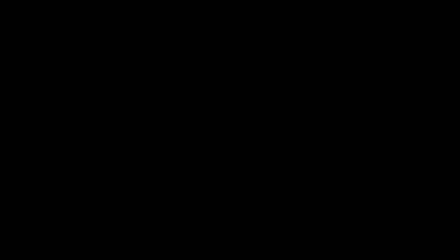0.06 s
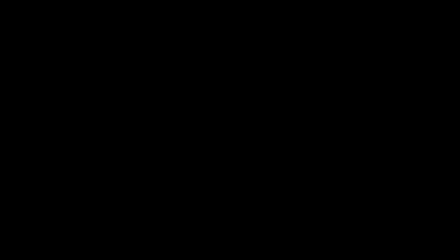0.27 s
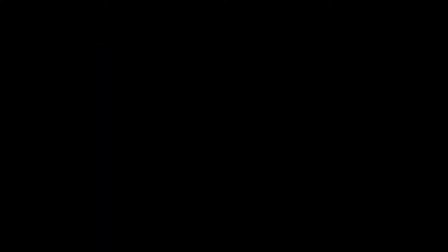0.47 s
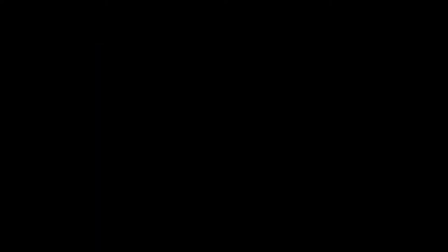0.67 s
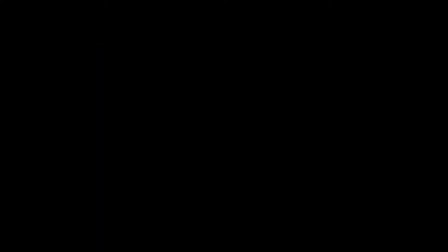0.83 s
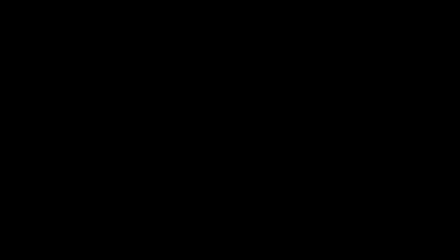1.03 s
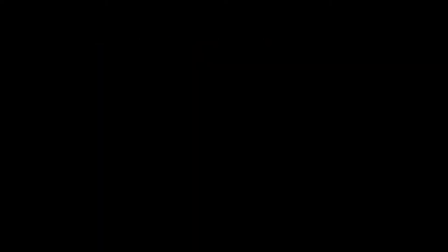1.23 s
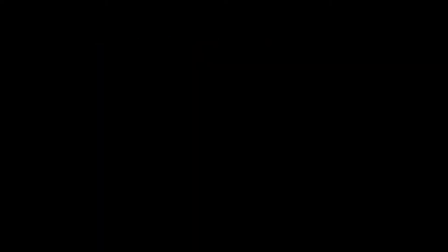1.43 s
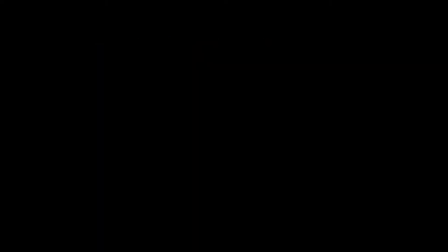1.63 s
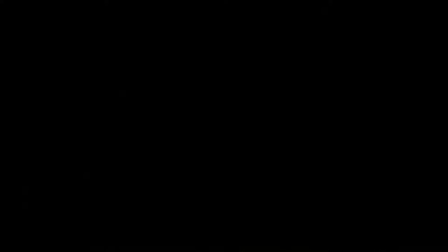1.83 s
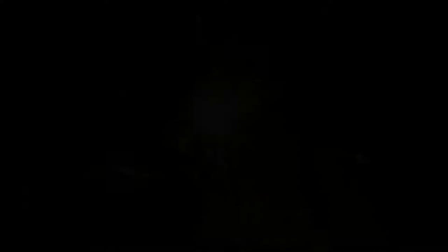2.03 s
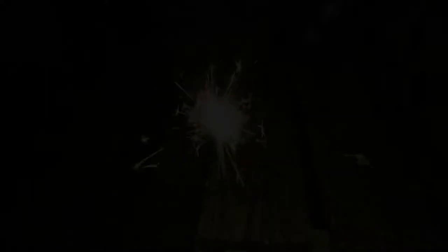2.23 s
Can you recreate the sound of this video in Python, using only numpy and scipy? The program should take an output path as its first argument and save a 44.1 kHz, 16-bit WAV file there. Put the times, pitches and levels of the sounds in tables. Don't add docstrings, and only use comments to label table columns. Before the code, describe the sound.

A sparkler fizzes steadily at night amid whining insects, then a hard knock bounces beside the microphone

```python
import sys
import numpy as np
from scipy import signal
from scipy.fft import rfft, irfft, next_fast_len
from scipy.io import wavfile

SR = 44100
rng = np.random.default_rng(int(sys.argv[2]) if len(sys.argv) > 2 else 0)


def store_wav(level_fs):
    pcm = np.round(np.clip(np.atleast_2d(level_fs), -1, 1) * 32767)
    wavfile.write(sys.argv[1], SR, pcm.T.astype(np.int16))


def gain_from_db(level_db):
    decades = np.asarray(level_db, float) / 20
    return 10 ** decades


N = 101430


def rms_one(x):
    return x / np.sqrt(np.mean(x ** 2) + 1e-20)


def at_hz(points, hz):
    table_hz, table_db = np.transpose(points)
    return np.interp(np.log(hz), np.log(table_hz), table_db)


def drift(rate_hz):
    step = 40
    r = np.exp(-2 * np.pi * rate_hz * step / SR)
    settle = 2000
    noise = rng.standard_normal(N // step + 2 + settle)
    slow = signal.lfilter([1], [1, -2 * r, r * r], noise)[settle:]
    return np.interp(np.arange(N) / step, np.arange(len(slow)), rms_one(slow))


def band(x, low_hz, high_hz, order=2):
    return signal.sosfilt(signal.butter(order, [low_hz, high_hz], "band", fs=SR, output="sos"), x)


def coloured(source, spectrum, patchy_db):
    edges = 25 * 2 ** np.arange(0, 9.6, 1 / 3)
    first, last = spectrum[0][0] / 2, spectrum[-1][0] * 2
    flat = np.zeros(N)
    for k, (low_hz, high_hz) in enumerate(zip(edges, edges[1:])):
        if first < low_hz < last:
            flat += gain_from_db(patchy_db * drift(22)) * band(source[k % 2], low_hz, high_hz)
    size = next_fast_len(N)
    hz = 1 + np.arange(size // 2 + 1) * SR / size
    shaped = irfft(rfft(flat, size) * gain_from_db(at_hz(spectrum, hz)), size)
    return rms_one(shaped[:N])


def click(s, db):
    x = np.full(N, 1e-18)
    x[int(s * SR)] = gain_from_db(db)
    return x


def ring(x, hz, t60):
    r = gain_from_db(-60 / (t60 * SR))
    w = 2 * np.pi * hz / SR
    return signal.lfilter([0, np.sin(w)], [1, -2 * r * np.cos(w), r * r], x)


def dying(s, t60):
    after = np.arange(N) / SR - s
    return (after >= 0) * gain_from_db(-60 * np.maximum(after, 0) / t60)


# time in seconds, level in dB.
BURN_LEVEL = [(0, -41), (.12, -42), (.43, -42), (.49, -38.5), (.58, -39.5), (.74, -43.5), (.8, -39.5),
              (.97, -44), (1.08, -40.5), (1.19, -42), (1.28, -40.5), (1.43, -41.5), (1.465, -45),
              (1.52, -41), (1.78, -41.5), (1.97, -39), (2.1, -43), (2.27, -41.5)]
# frequency in Hz, density in dB per Hz.
FIZZ_COLOUR = [(250, -3.5), (2300, 0.5), (4000, -7), (5600, -8), (8300, -4.5), (10400, 1), (13000, -5.5),
               (15600, -14.5)]
# time in seconds, rise in dB.
GAS_SPITS = [(.066, 3), (.252, 2), (.716, 4), (.784, 3), (.835, 3), (1.046, 3), (1.108, 4), (1.27, 2),
             (1.304, 3), (1.412, 4), (1.432, 3), (1.505, 3), (1.529, 4), (1.63, 3), (1.735, 2.5)]
SPARKS_PER_S, SPARK_SPREAD_DB, SPARK_SHARE = 3000, 3.5, 0.51
SPIT_RISE_S, SPIT_FALL_S = 0.00067, 0.01
FIZZ_DB, FLUTTER_DB, FLUTTER_HZ = 3.5, 0.8, 30


def sparkler():
    t = np.arange(N) / SR
    sparks = (rng.random((2, N)) < SPARKS_PER_S / SR) * rng.choice([-1, 1], (2, N))
    spark_size = np.minimum(rng.exponential(1, (2, N)), 4)
    sparks = rms_one(sparks * gain_from_db(SPARK_SPREAD_DB * spark_size))
    jet = rng.standard_normal((2, N))
    source = np.sqrt(1 - SPARK_SHARE) * jet + np.sqrt(SPARK_SHARE) * sparks
    level_db = np.interp(t, *np.transpose(BURN_LEVEL)) + FIZZ_DB + FLUTTER_DB * drift(FLUTTER_HZ)
    for s, rise_db in GAS_SPITS:
        peak_s = s + SPIT_RISE_S
        pace_s = np.where(t < peak_s, SPIT_RISE_S, SPIT_FALL_S)
        level_db = level_db + rise_db * np.exp(-np.abs(t - peak_s) / pace_s)
    return gain_from_db(level_db) * coloured(source, FIZZ_COLOUR, patchy_db=0.7)


# start in seconds, push in dB,
# crack in dB, scatter in dB, scatter t60 in seconds.
BLOWS = [
    (1.8143, -24, -4, -5.5, 0.11),
    (1.9557, -15, -24, -14, 0.13),
    (2.02, -26, -42, -27, 0.1),
]
# frequency in Hz, level in dB, t60 in seconds.
KNOCK_MODES = [(234, -11.5, 0.097), (373, -24, 0.097), (499, -21, 0.16), (643, -11, 0.048),
               (684, -12.5, 0.11), (820, -16.5, .018), (990, -13, 0.083), (1283, -6.5, 0.041),
               (1774, -6.5, 0.064), (2320, -12, 0.032), (2590, -19.5, 0.033), (2690, -10.5, 0.035),
               (3560, -18, .02)]
BOUNCE_MODES = [(292, -21, 0.049), (460, -36, 0.073), (702, -20, 0.083), (834, -33, 0.051),
                (1040, -18, 0.024), (1330, -1, 0.014), (1490, -8.5, 0.031), (2080, -13, 0.042),
                (2560, -20, .012), (3800, -12, 0.0066), (4900, -30, 0.0043)]
LAST_BOUNCE_MODES = [(239, -17, 0.016), (397, -30, 0.12), (602, -29, 0.063), (870, -39, .06),
                     (1000, -24.5, 0.044), (1394, -20.5, 0.039), (1730, -44, .04)]
PUSH_S, CRACK_T60_S = 0.0005, 0.013


def knocks():
    out, t = np.zeros(N), np.arange(N) / SR
    mode_sets = (KNOCK_MODES, BOUNCE_MODES, LAST_BOUNCE_MODES)
    for (s, push_db, crack_db, _, _), modes in zip(BLOWS, mode_sets):
        out += 0.5 * gain_from_db(push_db) * np.exp(-((t - s - PUSH_S / 2) / PUSH_S * 4) ** 2)
        for hz, mode_db, mode_t60 in modes:
            out += ring(click(s, mode_db), hz, mode_t60)
        crack = band(rng.standard_normal(N), 2300, 9800, order=1)
        out += gain_from_db(crack_db) * crack * dying(s, CRACK_T60_S)
    return out


# frequency in Hz, density in dB per Hz.
SCATTER_COLOUR = [(100, -10), (250, -1), (500, 0), (1100, -1), (2200, -8), (4000, -24), (9500, -32),
                  (15000, -44)]
RATTLES_PER_S = 500
LINGER_DB, LINGER_T60_S = -19.5, 0.38


def scatter():
    out = np.zeros(N)
    rattle = (rng.random((2, N)) < RATTLES_PER_S / SR) * rng.standard_normal((2, N))
    source = rms_one(rattle) + 0.5 * rng.standard_normal((2, N))
    debris = coloured(source, SCATTER_COLOUR, patchy_db=-1.0)
    for s, _, _, scatter_db, t60 in BLOWS:
        tail = dying(s, t60) + gain_from_db(LINGER_DB) * dying(s, LINGER_T60_S)
        out += gain_from_db(scatter_db) * debris * tail
    return out


# start in seconds, peak in dB, pitch in Hz,
# rise in seconds.
STAND_WOBBLES = [(1.815, -12, 95, .012), (1.8165, -9, 147, .012), (1.86, -19, 160, .013),
                 (1.9, -28, 118, .015), (1.935, -29, 220, .01), (1.953, -30, 95, .012),
                 (2.003, -27, 165, .013), (2.07, -38, 100, .013), (2.098, -35.5, 140, .013)]


def stand():
    out, t = np.zeros(N), np.arange(N) / SR
    rumble = rms_one(band(rng.standard_normal(N), 56, 400))
    for s, db, hz, rise_s in STAND_WOBBLES:
        age = np.maximum(t - s, 0) / rise_s
        sway = np.sin(2 * np.pi * hz * (t - s)) + 0.3 * rumble
        out += gain_from_db(db) * sway * (age * np.exp(1 - age)) ** 2
    return out


def jingle():
    peak_s, length_s, level_db = 1.834, 0.026, -25
    t = np.arange(N) / SR
    noise = rms_one(band(rng.standard_normal(N), 8600, 11500))
    return gain_from_db(level_db) * noise * np.exp(-(2 * (t - peak_s) / length_s) ** 2)


# time in seconds, peak in dB, pitch in Hz, t60 in seconds.
GRIT_TICKS = [(.0663, -38, 1980, .01), (.6692, -23, 1380, .014), (.6745, -36, 980, .025),
              (.7185, -34, 2100, .01), (.7515, -30, 1400, .012), (.7545, -25, 1900, .016),
              (.7884, -29, 1150, .008), (1.6986, -27, 1040, .008), (1.8563, -19, 1410, .014),
              (1.863, -23, 1100, .02), (1.9402, -25, 1000, .025), (2.2379, -36, 1300, .01)]
OVERTONE_RATIO, OVERTONE_DB = 1.62, -2


def ticks():
    out = np.zeros(N)
    for s, db, hz, t60 in GRIT_TICKS:
        out += ring(click(s, db), hz, t60)
        out += ring(click(s, db + OVERTONE_DB), hz * OVERTONE_RATIO, t60)
    return out


# time in seconds, peak in dB.
SPARK_POPS = [
    (.2530, -18),
    (1.529, -23),
    (1.8008, -16),
    (1.8108, -12),
    (1.8278, -11),
    (1.8325, -13),
    (1.9686, -14),
]


def pops():
    return -sum(band(click(s, db + 9.5), 500, 11000, order=1) for s, db in SPARK_POPS)


def chorus(singers, wander_hz, depth, chirp_db, sway_db, spread):
    out, t = 0, np.arange(N) / SR
    for hz, db, pulses_per_s, chirps_per_s in singers:
        pulse_phase, chirp_phase = rng.random(2) * [spread, 1]
        tone = np.sin(2 * np.pi * np.cumsum(hz + wander_hz * drift(15.36)) / SR)
        pulse_turns = pulses_per_s * t + pulse_phase + 0.05 * drift(4.2)
        pulse = 1 + depth * np.sin(2 * np.pi * pulse_turns)
        chirp = np.sin(2 * np.pi * (chirps_per_s * t + chirp_phase))
        out = out + tone * pulse * gain_from_db(db + chirp_db * chirp + sway_db * drift(5.2))
    return out


# pitch in Hz, level in dB, pulses per second,
# chirps per second.
HIGH_SINGERS = [(6850, -57, 52, 4.1), (6990, -49, 47, 4.9), (7078, -44, 50, 4.6), (7165, -48, 44, 5.3),
                (7250, -44, 49, 4.7), (7330, -48, 55, 4.4), (7410, -48, 41, 5.1), (7545, -50, 46, 4.8),
                (7740, -52, 40, 4.7)]
LOW_SINGERS = [(3190, -57, 69, 1.3), (3230, -52, 73, .9), (3303, -49, 73, 1.7), (3376, -48, 73, 1.1),
               (3449, -54, 73, 2.3)]
# low edge in Hz, high edge in Hz, level in dB.
FAR_CHORUS = [
    (6790, 7520, -36),
    (3127, 3430, -42),
]


def insects():
    far = np.zeros(N)
    for low_hz, high_hz, db in FAR_CHORUS:
        far += gain_from_db(db) * rms_one(band(rng.standard_normal(N), low_hz, high_hz, order=3))
    high = chorus(HIGH_SINGERS, wander_hz=12.61, depth=0.96, chirp_db=1.0, sway_db=5.9, spread=0.85)
    low = chorus(LOW_SINGERS, wander_hz=7.85, depth=1.0, chirp_db=0.83, sway_db=2.7, spread=0.47)
    return far + gain_from_db(0.8) * high + gain_from_db(-2.4) * low


# frequency in Hz, density in dB per Hz.
HUM_COLOUR = [(30, 13), (60, -2), (90, 1), (125, 12), (180, -23), (240, 12), (320, -19), (500, -4.5)]


def hum():
    return gain_from_db(-54.5) * coloured(rng.standard_normal((2, N)), HUM_COLOUR, patchy_db=6.5)


def scene():
    night = hum() + sparkler() + insects()
    fall = scatter() + stand() + knocks() + jingle()
    return (night + fall + ticks() + pops())[None]


def roll_off(x):
    return signal.sosfilt(signal.butter(12, 15750, fs=SR, output="sos"), x)


LIMIT_DB, RELEASE_DB_PER_S, LIMIT_ATTACK_S = -6, 170, 0.005


def record(dry):
    dry = signal.sosfilt(signal.butter(3, 65, "high", fs=SR, output="sos"), dry)
    over_db = np.maximum(20 * np.log10(np.abs(dry) + 1e-9) - LIMIT_DB, 0)
    ramp = RELEASE_DB_PER_S * np.arange(N) / SR
    held_db = np.maximum.accumulate(over_db + ramp, axis=1) - ramp
    r = np.exp(-1 / (LIMIT_ATTACK_S * SR))
    duck_db = signal.lfilter([1 - r], [1, -r], held_db)
    x = dry * gain_from_db(-duck_db)
    x = x / (1 + np.abs(x / 0.8) ** 6) ** (1 / 6)
    x = signal.sosfilt(signal.cheby2(10, 60, 18000, fs=SR, output="sos"), x)
    return roll_off(x)


dry = scene()
out = record(dry)
store_wav(out)
```